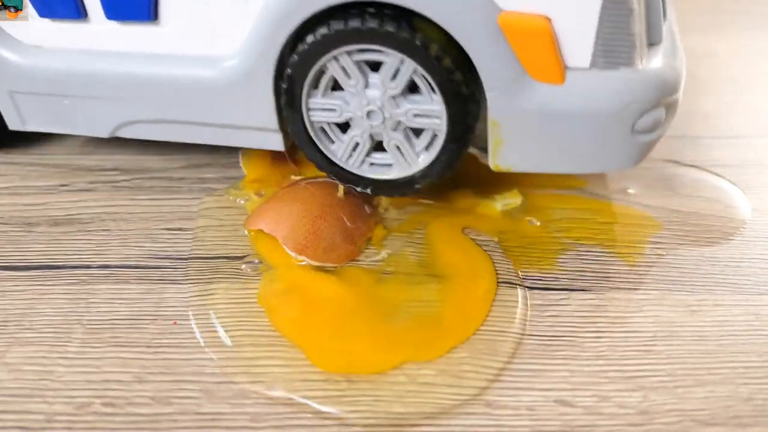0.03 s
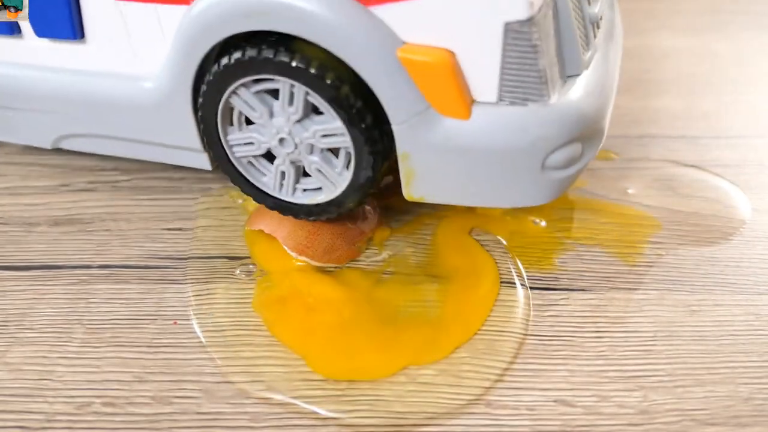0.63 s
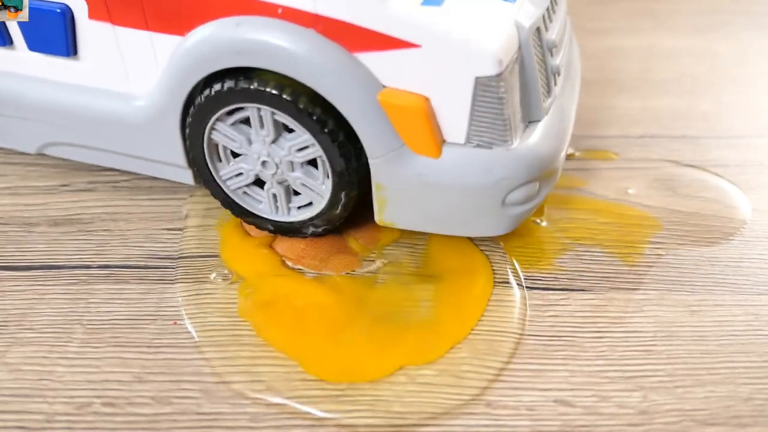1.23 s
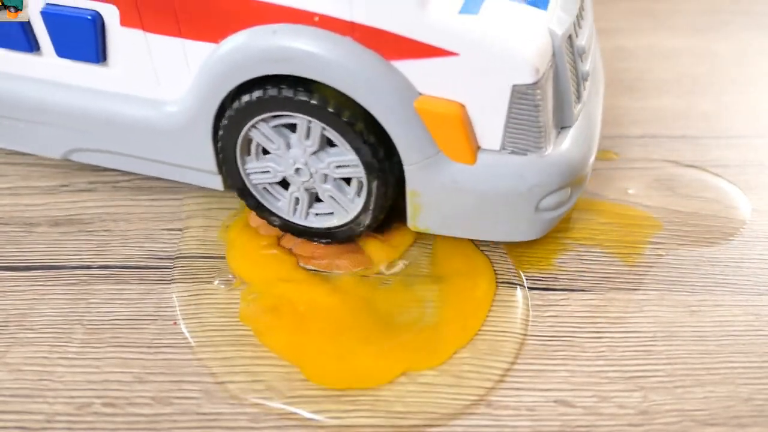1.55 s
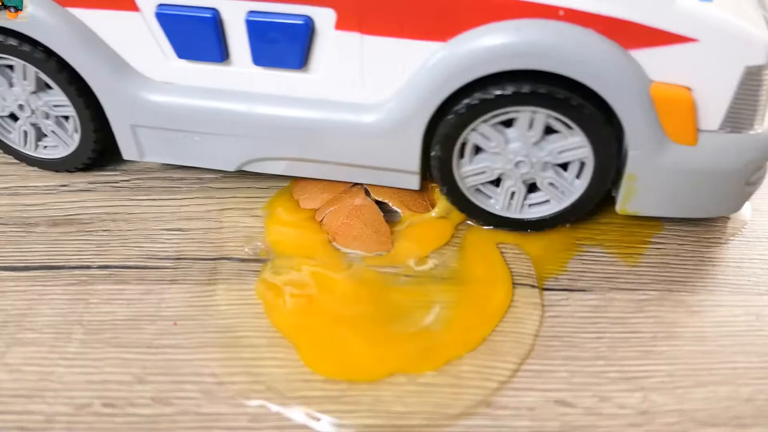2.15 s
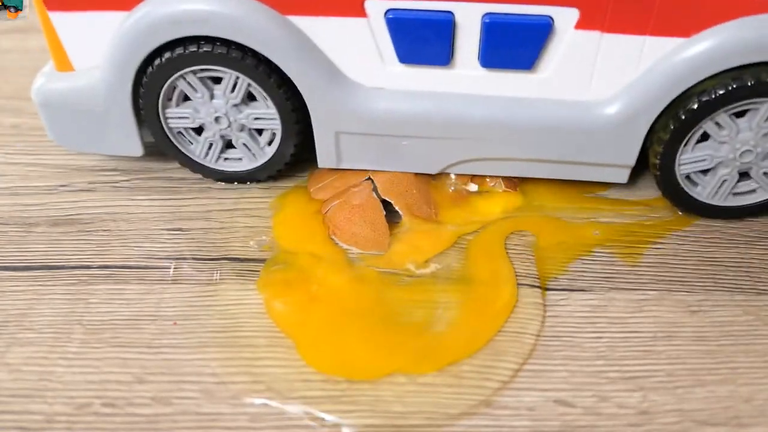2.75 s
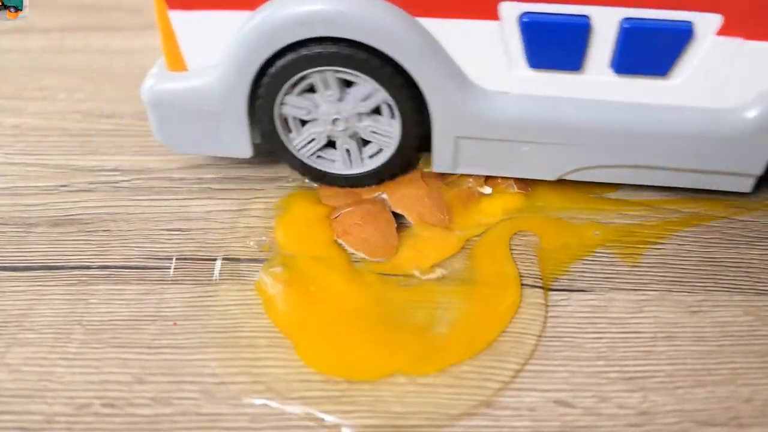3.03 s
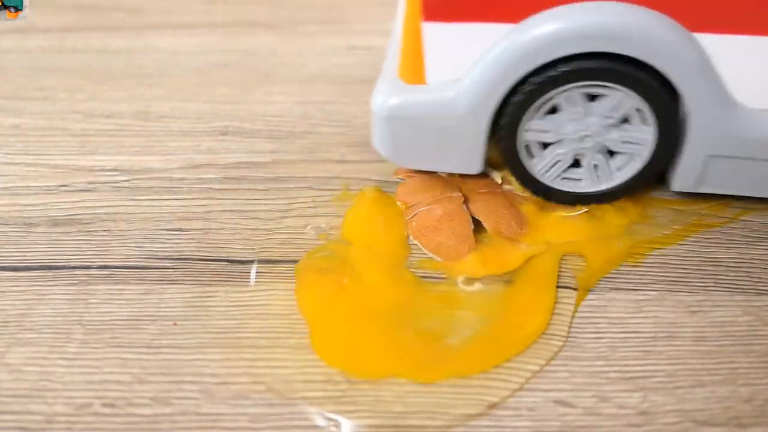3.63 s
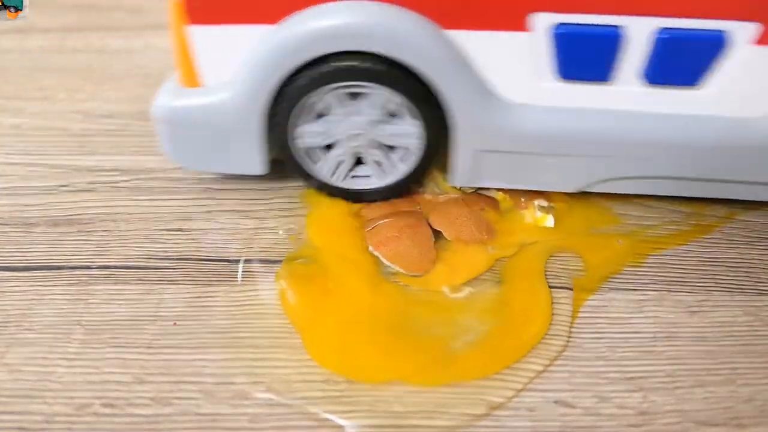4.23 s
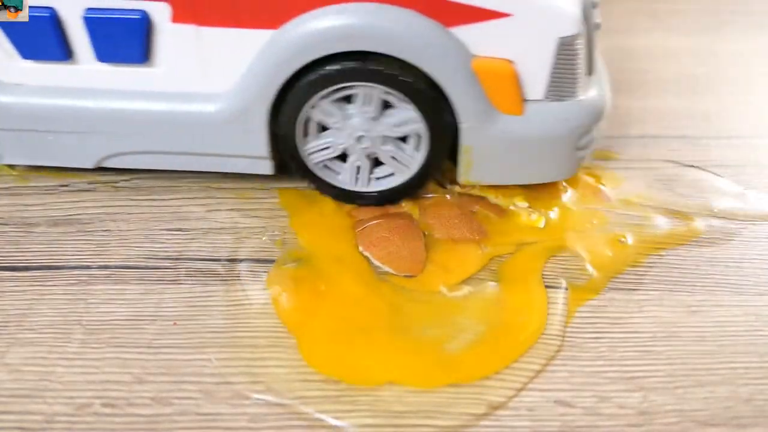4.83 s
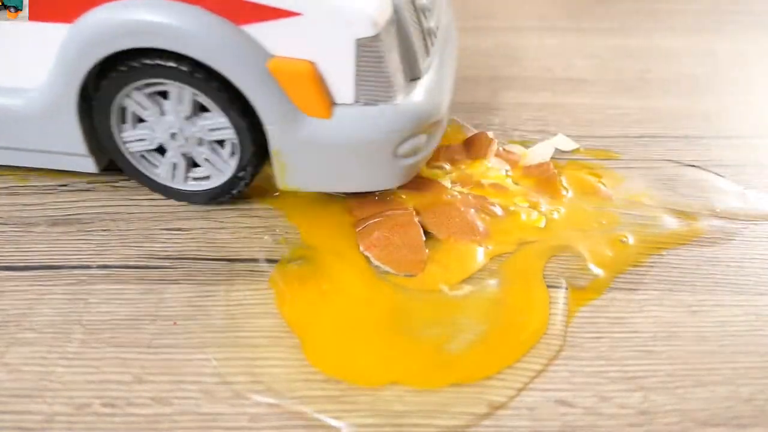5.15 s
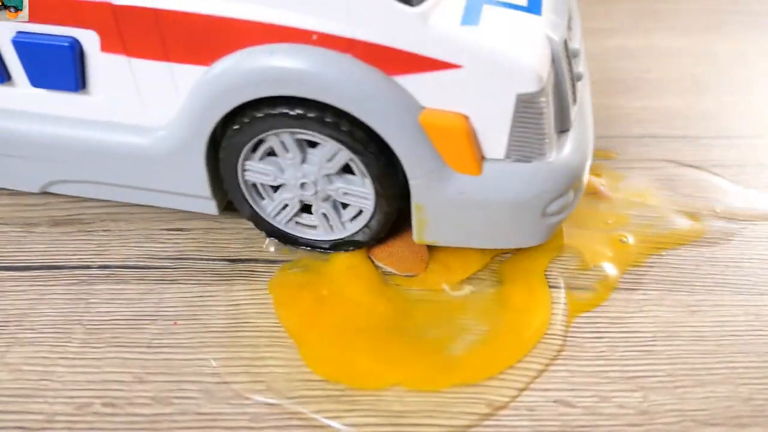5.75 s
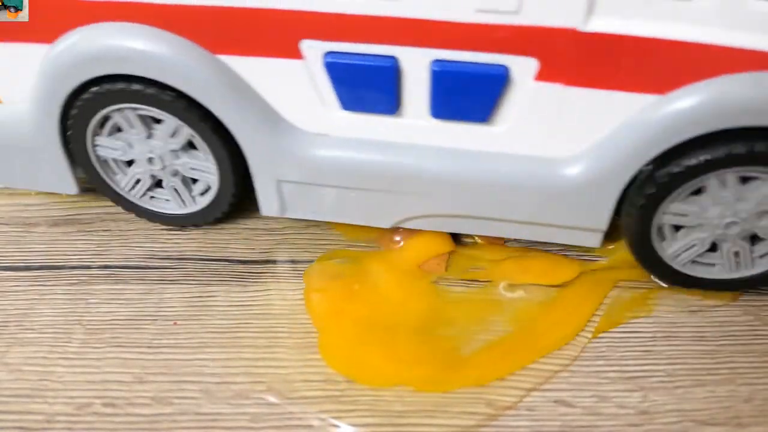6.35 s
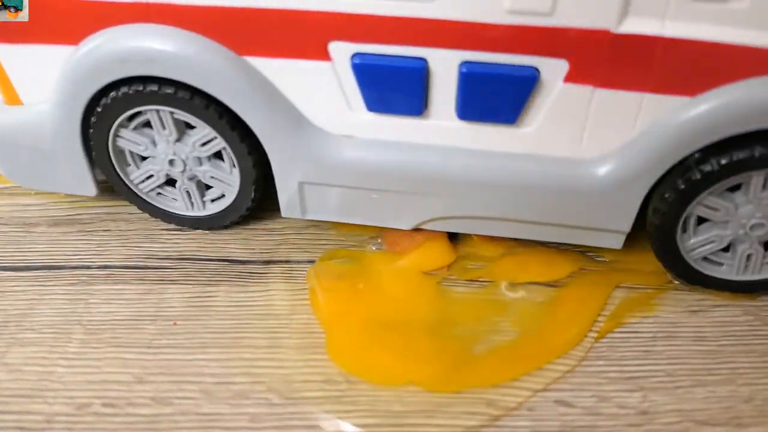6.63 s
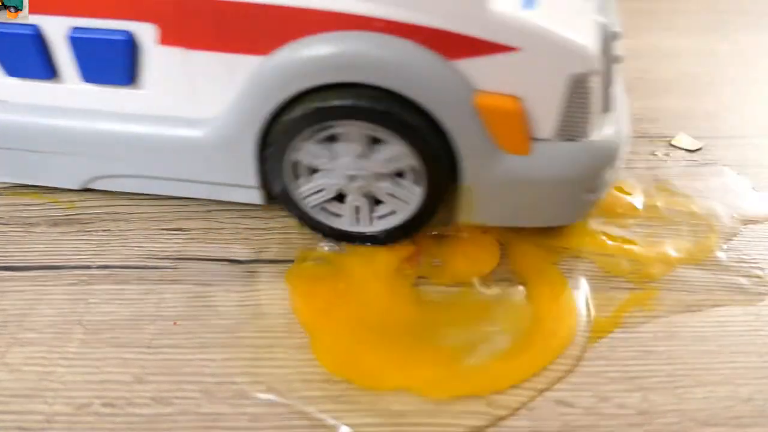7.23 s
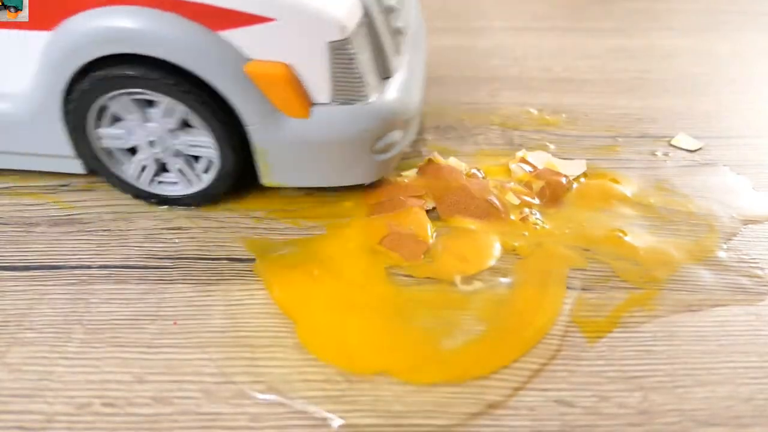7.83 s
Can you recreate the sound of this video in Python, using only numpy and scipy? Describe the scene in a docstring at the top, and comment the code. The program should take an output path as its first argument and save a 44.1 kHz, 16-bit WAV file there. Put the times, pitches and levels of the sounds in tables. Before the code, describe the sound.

A hollow plastic toy van is pushed back and forth over an egg on a wooden floor, close by in a small room. After a few light knocks the shell snaps and crumbles while the wheels rumble and rattle through the body. Wet tyres peel and squeak, and more crunching leads to several hard plastic knocks. A few last cracks follow, then sticky peeling and a low hum from the body.

```python
"""A hollow plastic toy van is pushed back and forth over an egg on a wooden floor, close by in a small room.
After a few light knocks the shell snaps and crumbles from 1 s, as the tread rumbles through the body.
From 2.3 s the wet tyres peel off the floor and squeak; near 3 s a hollow piece of shell caves in.
More crunching leads to the hardest knocks of the chassis, between 5.1 and 5.6 s. The last cracks come
around 6 and 7.2 s, and a final shove ends in sticky peeling and a low hum of the hollow body."""
import sys
import numpy as np
from scipy import signal
from scipy.io import wavfile
from scipy.ndimage import uniform_filter1d

SR = 44100
rng = np.random.default_rng(int(sys.argv[2]) if len(sys.argv) > 2 else 0)


def wrap_up_sound(samples):
    """Save the sound to the file named by the first command line argument, as 16-bit audio."""
    columns = np.atleast_2d(samples).T
    # keep every value between -1 and 1, then stretch to whole-number steps
    tamed = np.clip(columns, -1, 1)
    steps = np.round(tamed * 32767).astype(np.int16)
    wavfile.write(sys.argv[1], SR, steps)


N = 351918
TIME = np.arange(N) / SR
RING = TIME[:4096]  # time axis of one hit
TEN_MS = SR // 100


def amp(db):
    """Decibels to gain."""
    return 10 ** (np.asarray(db) / 20)


def unit_rms(x):
    """Scales to rms 1."""
    return x / np.sqrt(np.mean(x ** 2) + 1e-20)


def as_hit(x):
    """Scales a hit to the energy of 10 ms at rms 1."""
    return x / np.sqrt(np.sum(x ** 2) / TEN_MS + 1e-20)


def curve_at(points, hz):
    """Reads a curve on a log-frequency axis."""
    freqs, values = np.transpose(points)
    return np.interp(np.log(hz + 1), np.log(freqs + 1), values)


def add(mix, start, sound):
    """Mixes a sound in at a time in seconds."""
    part = mix[max(round(start * SR), 0):][:len(sound)]
    part += sound[:len(part)]


def eq(x, points):
    """Minimum-phase EQ through points of (frequency [Hz], gain [dB])."""
    log_gain = np.log(amp(curve_at(points, abs(np.fft.fftfreq(len(RING), 1 / SR)))))
    taps = np.fft.ifft(np.exp(np.conj(signal.hilbert(log_gain)))).real
    return signal.oaconvolve(x, taps[:len(RING) // 2])[:len(x)]


def resonate(x, hz, width_hz):
    """One broad resonance."""
    b, a = signal.iirpeak(min(hz, SR / 2 - 1000), max(hz / width_hz, .7), SR)
    return signal.lfilter(b, a, x)


def wander(length, hold):
    """Random modulation of rms about 1 that holds for some `hold` samples."""
    return unit_rms(uniform_filter1d(uniform_filter1d(rng.standard_normal(SR), hold), hold))[:length]


def grains(shapes, per_s, spread_db):
    """A cloud of tiny impacts of random time and size, each playing one of the shapes."""
    count = int(N / SR * 6000)
    chance, where, size, which = rng.random((4, count))
    fires = chance < per_s * N / SR / count
    gain = amp(spread_db * np.minimum(-np.log(1 - size), 4)) * fires
    out = np.zeros(N)
    for k, shape in enumerate(shapes):
        chosen = (which * len(shapes)).astype(int) == k
        impulses = np.bincount((where[chosen] * N).astype(int), gain[chosen], N)
        out += signal.oaconvolve(impulses, shape)[:N]
    return unit_rms(out)


def rub(row, fade_db, fade_curve, glide_curve):
    """Start, envelope and pitch of one hum, peel or squeak: it swells and fades as it glides."""
    start, attack, release, db, first_hz, last_hz = row
    t = TIME[:max(int((attack + release) * SR), TEN_MS)]
    fade = amp(fade_db * (np.maximum(t - attack, 0) / release) ** fade_curve)
    swell = np.minimum(t / attack, 1) * fade
    soft_ends = signal.windows.tukey(len(t), TEN_MS / 4 / len(t))
    hz = last_hz + (first_hz - last_hz) * (1 - t / t[-1]) ** glide_curve
    return start, amp(db) * swell * soft_ends, hz


# colour of the room tone: (frequency [Hz], level [dB])
ROOM_TONE_EQ = [(15, -78), (25, -30), (92, -7), (217, 8), (373, -0.5), (531, 6.5), (775, -1), (962, -2),
                (1100, 1.5), (1190, -6), (1610, -9.5), (4870, -18), (5280, -15.5), (12200, -24.5),
                (16000, -35)]


def room_tone():
    """A quiet, steady bed of dark noise, wide in stereo."""
    mid, side = (unit_rms(eq(noise, ROOM_TONE_EQ)) for noise in rng.standard_normal((2, N)))
    return amp(-53) * np.array([mid + side, mid - side])


# reverb time of the room: (frequency [Hz], t60 [s])
ROOM_DECAY = [(150, 0.9), (400, 0.69), (1000, 0.5), (2800, 0.85), (7000, 0.6), (14000, 0.17)]


def reverb(x, tail_db=-13, early_db=-12, width=0.87):
    """Early reflections within 20 ms, spread left and right, and a tail that dies band by band."""
    t = TIME[:SR * 2 // 3]
    wash = rng.standard_normal((2, len(t))) * (1 - np.exp(-t / 0.019))
    hz, age, bands = signal.stft(wash, SR, nperseg=256)
    tone_db = curve_at([(150, 7.5), (800, -2.5), (2000, 1.5), (5000, 2), (10000, 1.5), (15000, 15)], hz)
    decay_db = -60 * age / curve_at(ROOM_DECAY, hz)[:, None]
    response = signal.istft(bands * amp(tone_db[:, None] + decay_db), SR, nperseg=256)[1]
    response *= amp(tail_db) / np.linalg.norm(response[0])
    delays = rng.integers(TEN_MS // 10, TEN_MS * 2, 16)
    mid, side = rng.choice([-1, 1], (2, len(delays)))
    early = np.array([mid + width * side, mid - width * side]) / np.sqrt(len(delays))
    response[:, delays] += amp(early_db) * early
    return signal.oaconvolve(x[None], response, axes=1)[:, :N]


# low hums of the hollow van body as it rolls or drags:
# (time [s], attack [s], release [s], level [dB], first pitch [Hz], last pitch [Hz])
BODY_HUMS = [(0.563, 0.022, 0.024, -44, 306, 302), (1.668, 0.079, 0.045, -29, 241.7, 243),
             (1.85, 0.044, 0.074, -22.5, 285, 251.7), (2.2, 0.052, 0.097, -38, 232, 205.4),
             (2.407, 0.033, 0.096, -32, 238.5, 245), (2.585, 0.06, 0.085, -30, 250, 270.7),
             (2.961, 0.084, 0.69, -43, 197.5, 190.2), (4.04, 0.029, 0.11, -29, 195.2, 195),
             (4.239, 0.055, 0.33, -34, 193.5, 197), (4.95, 0.13, 0.21, -41.5, 195.5, 200.8),
             (7.2, 0.091, 0.2, -35.5, 200.6, 194.6), (7.76, 0.077, 0.078, -29, 283.6, 308),
             (7.899, 0.058, 0.077, -25, 329.6, 371)]


def body_hums(gain_db=-2, overtones_db=-11):
    """The hollow body hums, wavering: its air cavity rings as it rolls, or a dragging tyre judders."""
    out = np.zeros(N)
    for row in BODY_HUMS:
        start, envelope, hz = rub(row, fade_db=-9.5, fade_curve=0.88, glide_curve=0.96)
        phase = 2 * np.pi * np.cumsum(hz * (1 + .085 * wander(len(hz), hold=130))) / SR
        waver = amp(4 * wander(len(hz), hold=300))
        hum = np.sin(phase) + amp(overtones_db) * (np.sin(2 * phase) + np.sin(3 * phase))
        add(out, start, amp(gain_db) * envelope * unit_rms(hum * waver))
    return out


# sticky smacks of the tread: (time [s], attack [s], release [s], level [dB],
# first centre pitch [Hz], last centre pitch [Hz], pitch scatter [log ratio])
TREAD_PEELS = [(2.298, 0.074, 0.036, -41, 4470, 2970, 0.49), (2.391, 0.061, 0.2, -39.5, 2870, 2560, 0.58),
               (2.41, 0.0048, 0.016, -31, 2440, 2900, 0.6), (2.436, 0.011, 0.019, -35, 2840, 3380, 0.56),
               (2.56, .04, 0.052, -41.5, 2900, 2200, 0.31), (3.7, 0.071, 0.051, -36, 6440, 4940, 0.44),
               (7.05, .19, 0.067, -30.5, 1494, 1334, 0.402), (7.729, 0.11, 0.67, -54.5, 9400, 9400, 0.053),
               (7.76, 0.21, .2, -51.5, 6440, 6604, 0.14), (7.739, 0.22, 0.056, -37, 1510, 1490, 0.25)]


def peeling(per_s=3200, spread_db=2.5, bunch_db=3, cycles=8, glide=0.17, sizzle_db=-15):
    """Threads of egg snap off the tread in bunches: each a tiny tick and a rising chirp."""
    sizzle_eq = [(500, -13), (5000, 6), (9000, -4), (11000, -7), (13300, -6), (15500, -26)]
    out = np.zeros(N)
    t = RING[:TEN_MS * 2]
    for *row, scatter in TREAD_PEELS:
        start, envelope, centre_hz = rub(row, fade_db=-7.5, fade_curve=1, glide_curve=0.8)
        length = len(envelope)
        chirps, ticks = np.zeros((2, length))
        bunches = amp(bunch_db * wander(length, hold=200))
        threads = rng.random((1000, 4))[:max(int(per_s * length / SR), 1)]
        for where, size, pitch, phase in threads:
            at = int(where * length)
            hz = min(centre_hz[at] * np.exp(scatter * np.log(pitch / (1 - pitch) + 1e-9) / 2), SR / 3)
            age = hz * t / cycles
            sweep = np.sin(2 * np.pi * (hz * t * (1 + glide * t / t[-1]) + phase))
            strength = bunches[at] * amp(spread_db * min(-np.log(1 - size), 3))
            add(chirps, at / SR, strength * age ** .5 * np.exp(-2 * age) * sweep)
            ticks[at] += strength * np.sign(phase - .5)
        sizzle = unit_rms(eq(ticks, sizzle_eq))
        add(out, start, envelope * (unit_rms(chirps) + amp(sizzle_db) * sizzle))
    return out


# squeaks of slipping tyres: (time [s], attack [s], release [s], level [dB],
# first pitch [Hz], last pitch [Hz], pitch arch [Hz], roughness [capped at 1])
TYRE_SLIPS = [(2.37, 0.0093, 0.042, -40, 2460, 2630, 102, 0.6),
              (2.433, 0.0071, 0.04, -37.5, 3550, 3690, 200, 0.7),
              (2.493, 0.0088, 0.021, -36, 3900, 3940, 148, 0.66),
              (2.545, 0.02, 0.061, -47, 4550, 3300, 400, 0.74),
              (2.935, 0.033, 0.073, -36, 2933, 2730, 1, 0.77),
              (3.732, 0.0068, 0.0068, -24, 3590, 3540, 0, 0.7),
              (3.977, 0.02, 0.045, -30, 4060, 4530, 296, 1.06),
              (4.3505, 0.0015, 0.024, -23.5, 2900, 4170, 300, 0.96),
              (4.37, 0.012, 0.064, -26, 4230, 4280, 550, 0.82),
              (6.109, 0.004, 0.037, -35, 1566, 1600, 30, 0.4),
              (6.816, 0.084, 0.047, -50.5, 4090, 4130, 5, 0.6),
              (7.806, 0.0088, 0.012, -42, 3970, 4040, -2, 0.35)]


def squeaks(octave_db=-17, rasp_db=-3, jitter=.16, flutter_db=3.5):
    """Wet rubber sticks and slips thousands of times a second: thin when light, rasping when forced."""
    rasp_eq = [(700, -17), (1500, -1), (3000, 1.5), (5600, -11), (7200, -1.5), (8400, -17),
               (9200, -15), (10500, -12), (14000, -20)]
    out = np.zeros(N)
    for *row, arch_hz, rough in TYRE_SLIPS:
        start, envelope, hz = rub(row, fade_db=-9.5, fade_curve=2.6, glide_curve=0.95)
        rough = min(rough, 1)
        hz = hz + arch_hz * np.sin(np.linspace(0, np.pi, len(hz)))
        phase = 2 * np.pi * np.cumsum(hz * (1 + jitter * rough * wander(len(hz), hold=7))) / SR
        tone = unit_rms(np.sin(phase) + amp(octave_db) * np.sin(2 * phase))
        rasp = unit_rms(eq(rng.standard_normal(SR // 2), rasp_eq))[:len(hz)]
        voice = tone + amp(rasp_db) * rough ** 2 * rasp
        flutter = amp(flutter_db * rough * wander(len(hz), hold=30))
        add(out, start, envelope * unit_rms(voice * flutter))
    return out


THUMP_HZ, CLACK_HZ, RUMBLE_HZ, RATTLE_HZ = (170, 1200), (1200, 3100), (170, 430), (430, 1200)
# modes of the hollow plastic body: (frequency [Hz], level [dB], t60 [s])
BODY_MODES = [(197, -5, 0.17), (250, -3.5, 0.11), (309, 1, 0.049), (375, -0.5, 0.093), (456, 2.5, 0.056),
              (546, 5.5, 0.061), (622, 3, 0.082), (707.8, 9, 0.055), (800, 6, 0.078), (897, 10, 0.025),
              (1090, 3.5, 0.033), (1267, 4.5, 0.025), (1385, -1.5, 0.024), (1501, 3, 0.053),
              (1755, 4.5, 0.018), (1980, 0.5, 0.024), (2310, 1.5, 0.014), (2698, -7, 0.04),
              (2900, -13, 0.068)]


def body_ring(band, spread_db=3, detune=0.035, contact_s=0.000067):
    """The body struck somewhere: each spot weights and bends the modes of one band differently."""
    modes = np.array(BODY_MODES)
    inside = (modes[:, 0] > band[0]) & (modes[:, 0] < band[1])
    hz, db, t60 = modes[inside].T[:, :, None]
    weight, bend, phase = rng.standard_normal((3, len(modes), 1))[:, inside]
    partials = np.sin(2 * np.pi * (hz * (1 + detune * bend) * RING + phase))
    decay = amp(db + spread_db * weight - 60 * RING / t60)
    rise = 1 - np.exp(-RING / (contact_s + .5 / hz))  # low modes take longer to swing up
    low_cut = signal.butter(3, band[0], "high", fs=SR, output="sos")  # a small body radiates little bass
    return as_hit(signal.sosfilt(low_cut, (partials * decay * rise).sum(0)))


# colour of breaking crumbs: (frequency [Hz], level [dB])
CRUMB_EQ = [(1200, -37.5), (2400, 0.5), (3200, -2.5), (4000, 6), (5000, -6.5), (6100, 2.5), (7400, -7.5),
            (8200, -2), (9500, 3.5), (11500, -6.5), (15500, -16.5)]


def snap(hz, decay_s=0.0018, width_hz=2600, crumbs_db=-1.5, edge_db=-12):
    """A crack runs through the shell: a bright break, then a short burst that rings the broken piece."""
    t = RING[:TEN_MS * 2]
    spike = amp(7) * np.exp(-t / 0.00018)
    burst = rng.standard_normal(len(t)) * (np.exp(-t / decay_s) + spike) * (1 - np.exp(-t / .0002))
    piece = as_hit(resonate(resonate(burst, hz, width_hz * 2), hz, width_hz))
    crumbs = as_hit(eq(burst, CRUMB_EQ))
    edge = as_hit(resonate(burst * np.exp(-t / .0008), 12500, 5000))
    return as_hit(piece + amp(crumbs_db) * crumbs + amp(edge_db) * edge)


def chips(hz=6000, scatter=0.32, clack_db=-5):
    """Small fractures at random moments, each with its own snap and jolt of the body."""
    jolts = [body_ring(THUMP_HZ) + amp(clack_db) * body_ring(CLACK_HZ) for _ in range(16)]
    for jolt, offset in zip(jolts, np.linspace(-1, 1, len(jolts))):
        add(jolt, 0, snap(hz * np.exp(scatter * offset), decay_s=0.0016, edge_db=-17))
    return grains(jolts, per_s=90, spread_db=1)


# shoves of the hand: (time [s], attack [s], hold [s], release [s], rattle level [dB],
# rumble offset [dB], floor boom offset [dB], crunch offset [dB])
SHOVES = [(1.04, 0.075, .33, .25, -42, -15, -12, -1.5), (1.402, 0.2, 0.33, .2, -34.5, -10, -19, -7.5),
          (2.079, 0.17, 0.37, .3, -39.5, 2, -12, -7), (2.858, .12, 0.14, 0.15, -33, -4.5, -20, -3),
          (3.0, 0.13, .3, .2, -41, -4.5, -13, -11), (3.38, 0.15, 0.18, 0.29, -36.5, -2, -18, -0.5),
          (3.5, 0.19, 0.04, 0.098, -27, -1.5, -13.5, -7), (3.82, 0.19, 0.053, 0.11, -59.5, -12, -7, 15.5),
          (3.96, 0.095, 0.27, 0.14, -31.5, 1.5, -22, -4), (4.08, 0.19, .27, 0.28, -26.5, -2.5, -11.5, -11),
          (4.552, 0.11, 0.2, 0.083, -35.5, -8.5, -16.5, -9.5), (4.8, 0.11, 0.026, 0.18, -34.5, 2, -8, -5.5),
          (5.02, 0.11, 0.12, 0.31, -40, 1, -30, -10), (5.348, 0.026, 0.012, 0.16, -33.5, -5, -34, -17),
          (5.591, 0.031, 0.084, 0.29, -35, -4.5, -23, -12),
          (5.84, 0.047, 0.11, 0.55, -31.5, -19, -14.5, -9.5), (5.92, 0.21, .28, 0.17, -43, 5, -7, -1),
          (6.77, 0.43, 0.076, 0.45, -30, -4.5, -13, -25), (7.152, 0.31, 0.033, 0.2, -37, 2, -7, -26),
          (7.628, 0.13, 0.18, 0.18, -40, 3.5, -9, -9.5)]


def shove_levels(ends_db=-28, ramp_curve=1.173, sag_db_per_s=13.5, stop_db=-49, bass_follow=0.98):
    """Fader curves in dB for floor boom, rumble, rattle and crunch, following each shove's speed."""
    steps = TIME[::TEN_MS // 10]
    power = 1e-12
    for start, attack, hold, release, db, rumble_db, boom_db, crunch_db in SHOVES:
        t = steps - start - attack
        ramp = np.maximum(np.maximum(-t / attack, (t - hold) / release), 0)  # 0 in the hold, 1 at the ends
        speed_db = ends_db * ramp ** ramp_curve - sag_db_per_s * np.clip(t, 0, hold)
        speed_db += stop_db * np.maximum(ramp - 1, 0)  # beyond the ends the wheels come to rest
        bass_db = bass_follow * speed_db
        layers_db = np.array([boom_db + bass_db, rumble_db + bass_db, speed_db, crunch_db + speed_db])
        power = power + amp(db + layers_db) ** 2
    return [np.interp(TIME, steps, level) for level in 10 * np.log10(power)]


def wheels(crumb_share=0.42, heavy_db=-39, bunch_db=4.6):
    """Tread bumps shake the boards and the body while crumbs of shell are ground against the floor."""
    boards_eq = [(20, -18), (50, -26), (90, -11), (115, -8.5), (139, -2.5), (165, -15), (260, -21),
                 (800, -41)]
    grit_eq = [(2500, 4), (4000, 7.5), (8000, -3.5), (10000, -8), (12000, -46), (15500, -11)]
    boards_db, rumble_db, rattle_db, crunch_db = shove_levels()
    clack_db = (1 - crumb_share) * rattle_db + crumb_share * crunch_db  # panels answer tread and crumbs
    splinter_db = crunch_db + 0.5 * np.minimum(crunch_db - heavy_db, 0)  # heavy grinding splinters most
    boards = unit_rms(eq(rng.standard_normal(N), boards_eq))
    rumble = grains([body_ring(RUMBLE_HZ) for _ in range(8)], per_s=630, spread_db=1.5)
    rattle = grains([body_ring(RATTLE_HZ) for _ in range(14)], per_s=700, spread_db=2)
    clack = grains([body_ring(CLACK_HZ, detune=0.044) for _ in range(16)], per_s=800, spread_db=3.5)
    pieces = [snap(hz, decay_s=0.0011, width_hz=1400, crumbs_db=-2.5)
              for hz in np.geomspace(2900, 11500, num=14)]
    grit = eq(grains(pieces, per_s=3800, spread_db=-3), grit_eq)
    bunches = np.clip(unit_rms(uniform_filter1d(rng.standard_normal(N), TEN_MS // 2)), -2, 2)
    grit = unit_rms(grit * amp(bunch_db * bunches))  # crumbs give way in bunches
    splinters = grains(pieces, per_s=600, spread_db=2.5)
    layers = [(boards, boards_db - 1), (rumble, rumble_db - 1), (rattle, rattle_db), (clack, clack_db - 1),
              (grit, crunch_db - 2.5), (splinters, splinter_db - 6), (chips(), splinter_db - 4)]
    return sum(amp(db) * sound for sound, db in layers)


def panels(hz=1630, width_hz=470, t60=0.47):
    """Many close modes of the thin side panels ring on after a knock."""
    t = TIME[:SR // 2]
    wash = resonate(resonate(rng.standard_normal(len(t)), hz, width_hz), hz, width_hz)
    return as_hit(wash * amp(-60 * t / t60))


def boom(hz, t60):
    """One low mode that takes a cycle to swing up."""
    return as_hit(np.sin(2 * np.pi * hz * RING) * (1 - np.exp(-hz * RING)) * amp(-60 * RING / t60))


# jolts of the axles and body: (time [s], thump [dB], clack [dB], contact tick [dB])
CHASSIS_HITS = [(0.158, -41, -56, -60), (0.57, -45, -72, -76), (0.658, -72, -42, -66),
                (0.736, -49, -63, -78), (0.783, -50, -53, -60), (0.947, -43.5, -47.5, -58.5),
                (1.403, -29.5, -41, -56.5), (1.504, -30, -55, -46), (1.561, -28.5, -46, -60),
                (1.717, -21, -38, -41), (2.143, -33, -36, -43.5), (2.253, -27, -33.5, -61),
                (3.644, -31, -31, -30), (4.057, -20.5, -33, -27.5), (4.168, -21, -45, -29),
                (4.505, -21, -25.5, -34), (4.657, -23.5, -32, -44), (4.913, -19, -31, -29.5),
                (5.162, -27.5, -27, -46), (5.167, -20.5, -16, -28.5), (5.194, -21, -22, -28),
                (5.215, -23, -27.5, -43), (5.346, -21.5, -19, -36), (5.356, -16.5, -20.5, -29),
                (5.369, -39, -22.5, -33), (5.558, -34.5, -50, -50), (5.608, -19.5, -17, -27.5),
                (5.612, -15.5, -12.5, -19.5), (5.861, -25.5, -20.5, -32), (6.112, -28.5, -28, -46),
                (6.378, -65.5, -52, -39.5), (7.297, -17, -29, -36.5)]


def knocks(tick_decay_s=0.0052, hand_decay_s=0.016, flam_s=.0038, flam_db=-2.5):
    """The chassis slaps down on its axles and rings its panels; the hand shortens the ring."""
    tick_eq = [(60, -30), (800, -1.5), (2200, 4.5), (3000, -1.5), (4000, 2), (5200, -4), (7300, -9),
               (10000, -17), (15000, -31)]
    out = np.zeros(N)
    damping = np.exp(-RING / hand_decay_s)
    tick_envelope = np.exp(-RING / tick_decay_s) * (1 - np.exp(-RING / 0.00015))
    first_tyre = np.array(CHASSIS_HITS)
    second_tyre = first_tyre + [flam_s, flam_db, flam_db, flam_db]  # lands just after the first
    floor = amp(-25.5) * boom(hz=137.5, t60=0.042)
    cavity = amp(-19) * boom(hz=209, t60=0.058)  # the air inside the body
    for start, thump_db, clack_db, _ in first_tyre:
        add(out, start, amp(thump_db) * (floor + cavity))
        add(out, start, amp(clack_db - 16) * panels())
    for start, thump_db, clack_db, tick_db in np.vstack([first_tyre, second_tyre]):
        tick = eq(rng.standard_normal(len(RING)) * tick_envelope, tick_eq)
        low_ring = body_ring(THUMP_HZ, spread_db=2, detune=0.026, contact_s=0.000085)
        high_ring = body_ring(CLACK_HZ, spread_db=-2, detune=0.025, contact_s=0.00033)
        axle = amp(1) * resonate(low_ring, hz=410, width_hz=130)
        thump = resonate(low_ring, hz=730, width_hz=600) + axle
        clack = resonate(high_ring, hz=1700, width_hz=450)
        add(out, start, amp(tick_db - 1) * as_hit(tick))
        add(out, start, amp(thump_db - 2) * as_hit(thump * damping))
        add(out, start, amp(clack_db - 4) * as_hit(clack * damping))
    return out


# modes of a hollow piece of shell: (frequency [Hz], level [dB], t60 [s])
CUP_MODES = [(2700, -11, .014), (2890, 4, 0.021), (4420, 4, 0.012), (5210, -9, 0.011)]
# pops as that piece caves in: (time [s], level [dB])
CUP_POPS = [(2.962, -31), (2.9753, -23), (2.9791, -24.5)]


def shell_pops():
    """A still hollow piece of shell rings briefly as it gives way."""
    out = np.zeros(N)
    hz, db, t60 = np.transpose(CUP_MODES)[:, :, None]
    ring = as_hit((amp(db - 60 * RING / t60) * np.sin(2 * np.pi * hz * RING)).sum(0))
    for start, level_db in CUP_POPS:
        add(out, start, amp(level_db) * ring)
    return out


# foreground cracks of the shell: (time [s], van thump [dB], snap [dB], snap pitch [Hz])
SHELL_CRACKS = [(1.0393, -60, -52, 6140), (1.0704, -25, -24, 5850), (1.087, -36, -33.5, 7200),
                (1.129, -53, -41, 6200), (1.148, -35, -43, 5940), (1.1594, -36, -45, 5600),
                (1.2042, -24, -28, 6900), (1.2086, -47, -48, 7900), (1.2197, -28, -27.5, 5000),
                (1.228, -26, -36, 7340), (1.326, -25.5, -24.5, 9000), (1.3529, -25.5, -34, 7520),
                (1.3921, -28, -36, 5580), (1.492, -37, -44, 4715), (1.505, -40, -37, 4500),
                (1.5163, -33, -29.5, 7900), (1.529, -29.5, -39, 6700), (1.561, -41, -37, 5900),
                (1.569, -51, -30.5, 8200), (1.578, -25.5, -35, 5100), (1.582, -36, -31, 7300),
                (1.59, -23.5, -30, 5600), (1.622, -25, -42, 4400), (1.6341, -43, -43, 5400),
                (1.6591, -30.5, -27, 7600), (1.719, -35.5, -38, 6030), (1.728, -35, -40, 7500),
                (1.761, -45, -44, 6560), (1.79, -47, -41, 7140), (1.8014, -32, -43, 5500),
                (1.8069, -24, -42, 5400), (1.8262, -20, -39, 5430), (2.1927, -33, -38, 5800),
                (2.282, -59, -43, 4470), (2.9574, -42, -48, 6000), (2.969, -30, -27, 4870),
                (2.98, -24.5, -26.5, 5000), (2.999, -29, -34, 6500), (3.013, -30, -32, 5550),
                (3.0238, -32, -33, 6200), (3.032, -29, -29.5, 9200), (3.0516, -49, -51, 4400),
                (3.0666, -48, -36.5, 6300), (3.0778, -45, -34, 6800), (3.0829, -31.5, -41, 4600),
                (3.1061, -26.5, -34.5, 5600), (3.193, -50.5, -52, 6890), (3.432, -41.5, -27, 7400),
                (3.452, -37, -39, 4400), (3.4866, -40, -28, 9300), (3.5026, -35, -39, 6200),
                (3.518, -40, -33.5, 7200), (3.534, -40, -43, 4290), (3.5417, -32, -36, 5460),
                (3.5623, -30.5, -28.5, 6000), (3.585, -32, -42, 5200), (3.5926, -49, -41, 4200),
                (3.6088, -38, -35.5, 6980), (3.6246, -37, -40, 4970), (3.6428, -38, -32, 6000),
                (3.658, -29, -28.5, 6200), (3.6647, -30, -30, 6050), (3.6804, -40, -36, 5400),
                (3.6931, -26, -35, 4370), (3.6995, -34, -24, 5870), (3.714, -34, -30, 6500),
                (3.7175, -30, -30, 4520), (4.0563, -28, -32, 8000), (4.0694, -22, -36, 6350),
                (4.1187, -24.5, -39, 5400), (4.1305, -27, -30.5, 6660), (4.152, -47, -38, 5000),
                (4.1668, -25, -37, 6500), (4.192, -28, -37, 6500), (4.207, -34, -28.5, 7800),
                (4.215, -29, -44, 6100), (4.247, -31, -31, 5500), (4.2557, -26, -31, 4100),
                (4.265, -27, -28.5, 4760), (4.2804, -23, -29, 4570), (4.299, -29, -41, 5900),
                (4.462, -21, -31.5, 4600), (4.4759, -25.5, -30.5, 4700), (4.5069, -28, -43, 5500),
                (4.527, -28, -41, 6900), (4.5443, -25.5, -37, 5454), (4.553, -23.5, -37.5, 4440),
                (4.5943, -30, -42, 6500), (4.6124, -34, -43, 5000), (4.6227, -26, -38, 6140),
                (4.7199, -38, -37, 7100), (4.7264, -25, -38, 6350), (4.7299, -30, -33, 6430),
                (4.746, -37, -40, 7000), (4.7562, -24.5, -38, 6300), (4.781, -31, -47, 7000),
                (4.798, -24.5, -48, 5440), (4.8044, -44, -44, 7300), (4.817, -43, -48, 7500),
                (4.8338, -32.5, -46, 6700), (4.8499, -21.5, -30, 8020), (4.9294, -33, -41, 4250),
                (5.0337, -37, -51, 4040), (5.866, -24.5, -34.5, 4830), (5.878, -24, -29, 7340),
                (5.8881, -40, -34, 5300), (5.901, -35, -33, 7500), (5.9063, -34, -39, 6700),
                (5.9202, -25, -41, 6200), (5.938, -39, -40, 7500), (5.9439, -22.5, -31, 5270),
                (5.949, -29, -36, 5000), (5.9761, -30.5, -36, 6940), (5.9892, -33, -41, 7000),
                (6.019, -34, -45, 5800), (6.026, -31, -48, 5600), (6.061, -36, -34.5, 4520),
                (6.079, -36, -45, 6500), (6.1375, -30, -37.5, 5170), (7.102, -25, -34, 5000),
                (7.169, -35, -38.5, 5030), (7.1971, -25.5, -33, 5240), (7.2012, -26, -36.5, 4900),
                (7.2327, -32, -41, 5800), (7.2431, -24, -30.5, 5660), (7.276, -25.5, -38.5, 5870)]


def shell_cracks(thump_share=0.54):
    """Each fracture snaps, and the wheel drops a little and rings the body."""
    out = np.zeros(N)
    for start, thump_db, snap_db, hz in SHELL_CRACKS:
        clack_db = thump_share * thump_db + (1 - thump_share) * snap_db - 6
        add(out, start, amp(snap_db) * snap(hz))
        add(out, start, amp(thump_db - 1) * body_ring(THUMP_HZ) + amp(clack_db) * body_ring(CLACK_HZ))
    return out


# pan of the van: (time [s], left minus right [dB])
VAN_PAN = [(0, 4), (1.2, 1), (2.3, 0.3), (3.2, -0.5), (3.8, -1.5), (4.3, -0.5), (4.8, 0.5), (5.3, 3),
           (5.7, 1.5), (6.2, 0), (7.3, 1), (7.9, 3)]


def scene():
    """The van and the egg drift around the centre, over reverb and room tone."""
    close = shell_cracks() + shell_pops() + knocks() + wheels() + body_hums() + squeaks() + peeling()
    pan_db = np.interp(TIME, *np.transpose(VAN_PAN))
    return close * amp([pan_db / 2, -pan_db / 2]) + reverb(close) + room_tone()


def record(dry):
    """A steep high cut at 16.2 kHz."""
    high_cut = signal.firwin(255, 16200, window=("kaiser", 9), fs=SR)
    return signal.oaconvolve(dry, high_cut[None], "same")


dry = scene()
out = record(dry)
wrap_up_sound(out)
```